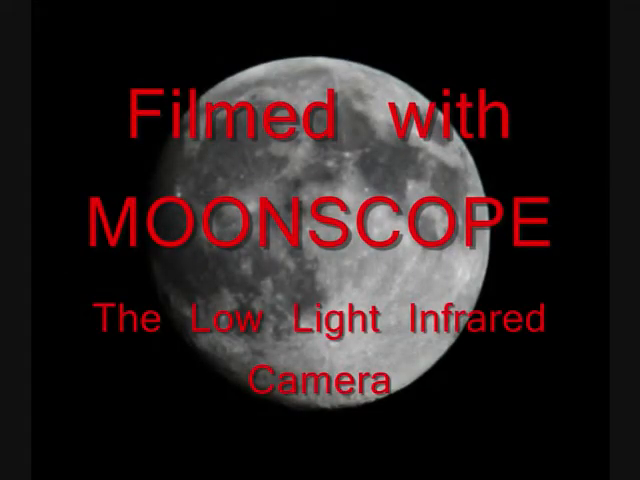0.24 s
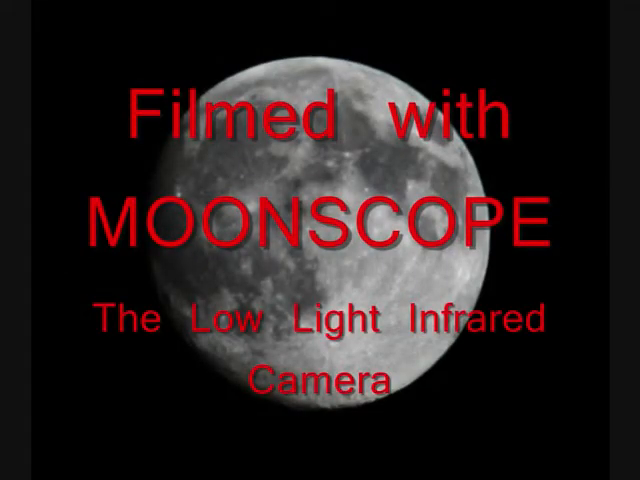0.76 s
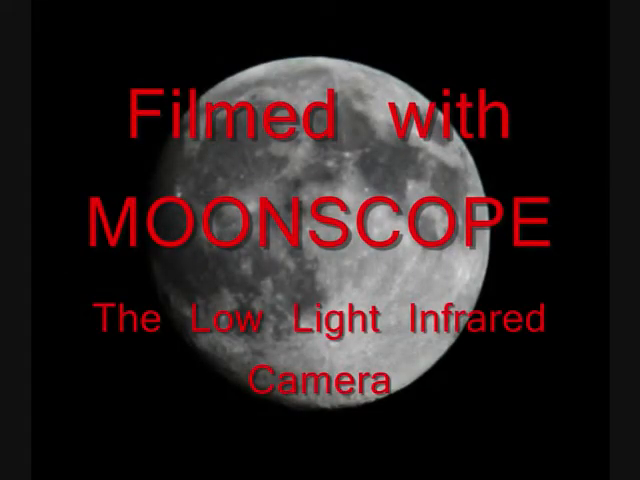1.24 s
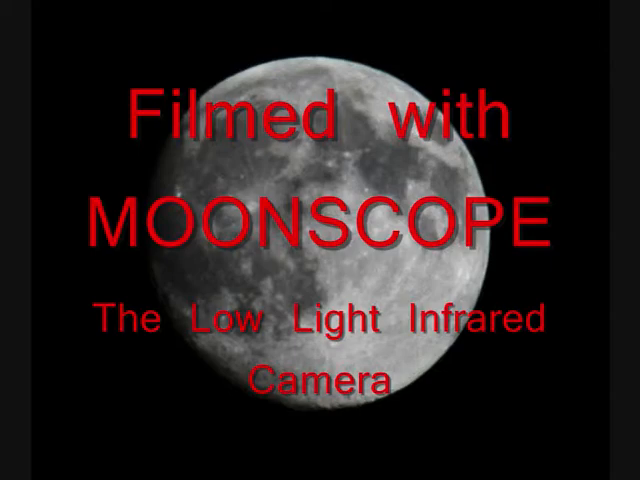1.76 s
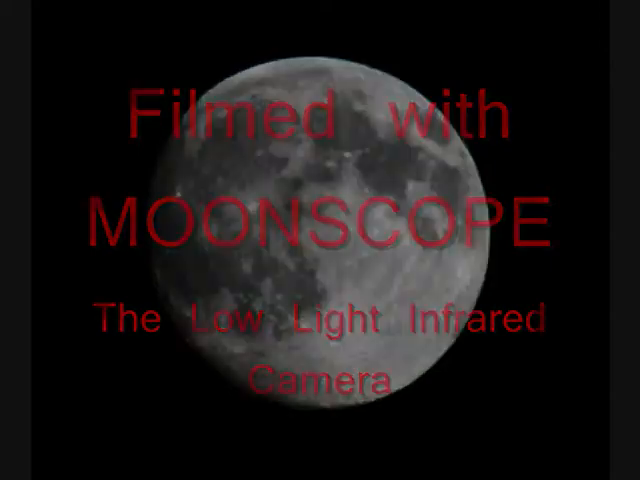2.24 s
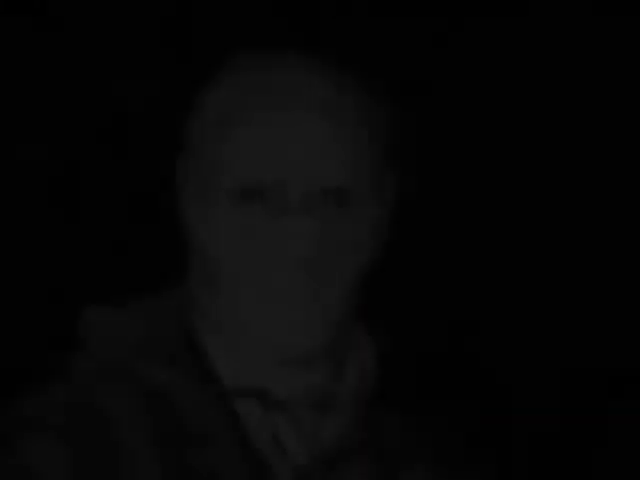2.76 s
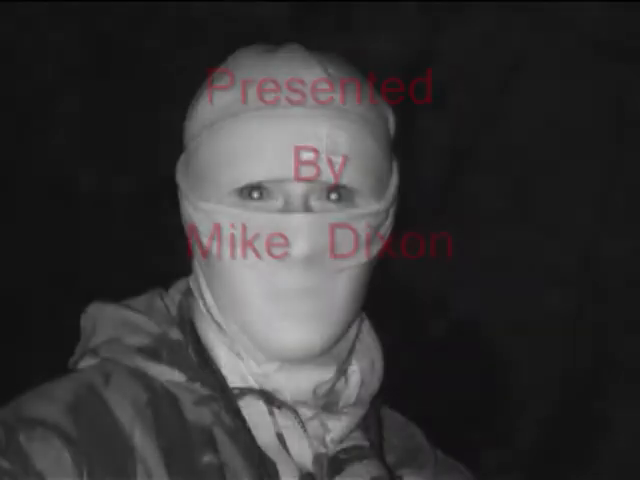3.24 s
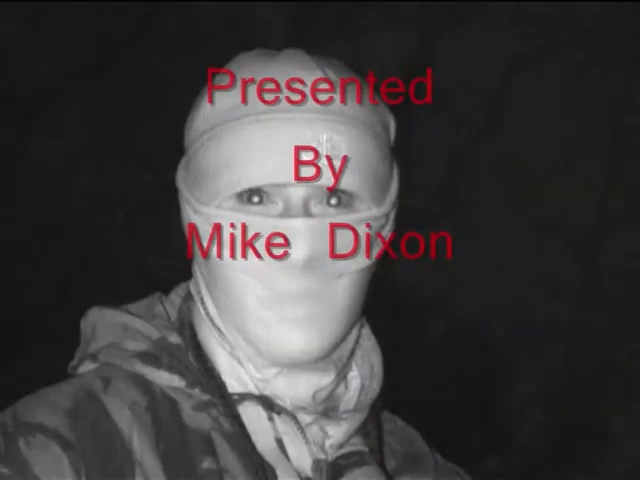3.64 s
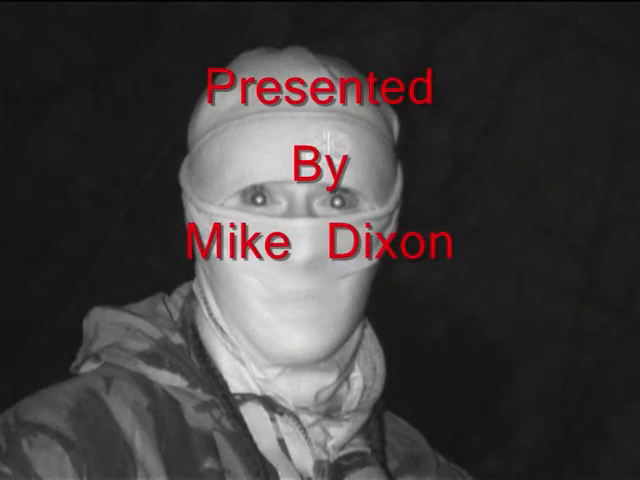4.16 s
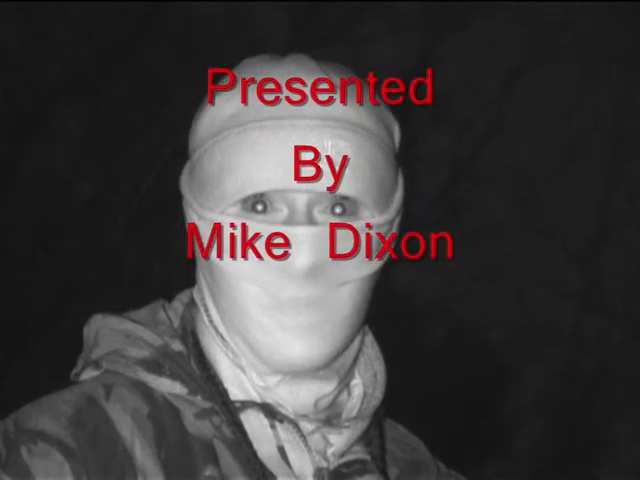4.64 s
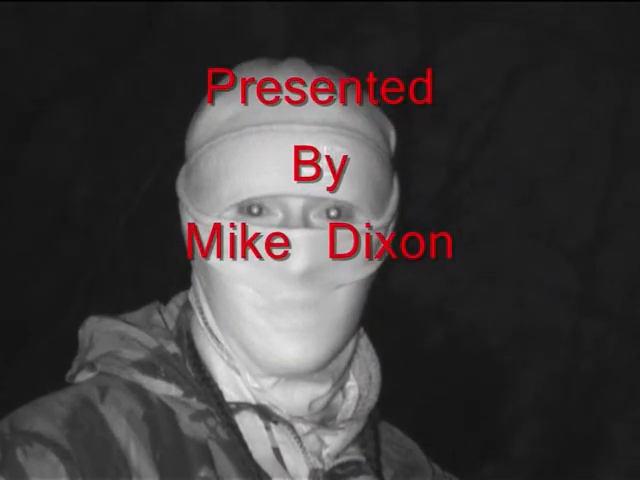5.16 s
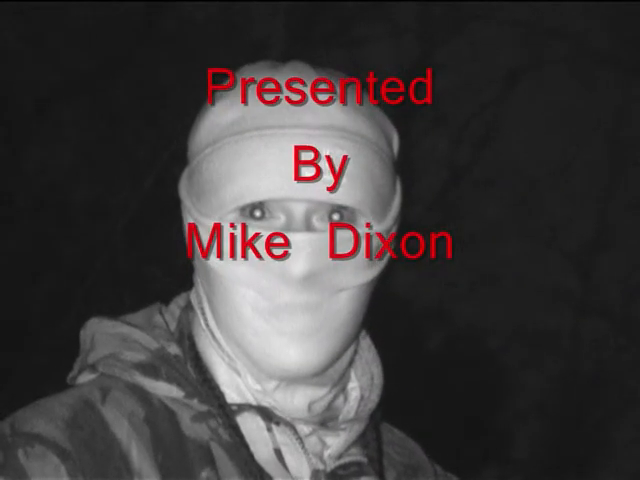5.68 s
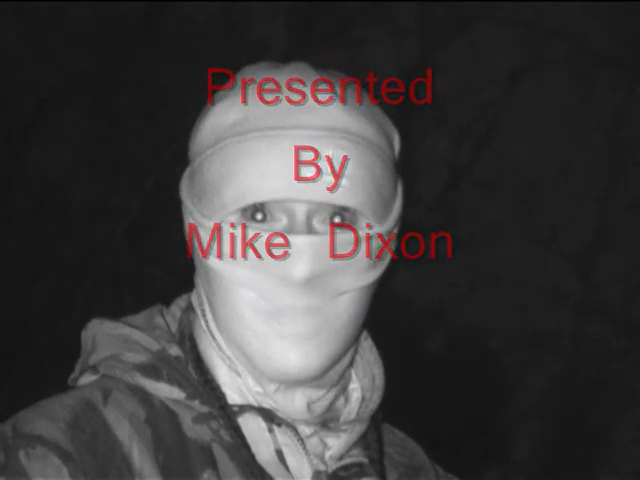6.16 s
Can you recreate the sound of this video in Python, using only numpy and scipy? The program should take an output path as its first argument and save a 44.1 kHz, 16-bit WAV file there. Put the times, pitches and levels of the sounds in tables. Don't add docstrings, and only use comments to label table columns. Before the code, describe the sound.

Quiet night woodland with low traffic rumble and hiss, two brief piercing owl shrieks to the right, and one faint echoing hoot between them.

```python
import sys
import numpy as np
from scipy import signal
from scipy.fft import rfft, irfft, next_fast_len
from scipy.io import wavfile
from scipy.ndimage import uniform_filter1d

SR = 44100
rng = np.random.default_rng(int(sys.argv[2]) if len(sys.argv) > 2 else 0)


def file_out(sig):
    cols = np.atleast_2d(sig).T
    lim = np.clip(cols, -1, 1)
    pcm = np.round(lim * 32767).astype(np.int16)
    wavfile.write(sys.argv[1], SR, pcm)


def boost(x):
    u = np.asarray(x, float) / 20
    return 10 ** u


N = 282795

LEFT_RIGHT = np.array([[1], [-1]])


def over_hz(table, hz):
    table_hz, values = np.transpose(table)
    return np.interp(np.log(np.maximum(hz, 1)), np.log(table_hz), values)


def over_time(rows, smooth_s):
    s, *columns = np.transpose(rows)
    t = np.arange(s[0] * SR, s[-1] * SR) / SR
    smooth = int(smooth_s * SR)
    curves = [uniform_filter1d(np.interp(t, s, c), smooth, mode="nearest") for c in columns]
    return int(s[0] * SR), curves


def band(size, hz, octaves):
    f = np.maximum(np.fft.rfftfreq(size, 1 / SR), 1)
    bell = np.exp(-.5 * (np.log2(f / hz) / octaves) ** 2)
    return irfft(rfft(rng.standard_normal((2, size))) * bell, size)


def walk(size, rate):
    hold = int(SR / rate)
    levels = np.repeat(rng.standard_normal(size // hold + 1), hold)
    return 1.8 * uniform_filter1d(uniform_filter1d(levels, hold), hold)[:size]


# frequency in Hz, level in dB per Hz.
NIGHT_SPECTRUM = [(15, -39), (25, -6.5), (70, -0.5), (140, -6.5), (184, -14), (228, -16), (291, -22.5),
                  (391, -16.5), (447, -24), (602, -9.5), (670, -17), (854, -13.5), (3120, -26.5),
                  (7790, -39.5), (15700, -37.5)]
# frequency in Hz, left-right likeness from 0 to 1.
LIKENESS = [(25, .88), (60, .78), (130, .3), (300, .05), (3000, .05), (6000, .15), (15000, .08)]
# frequency in Hz, left minus right in dB.
TRAFFIC_PAN = [(70, 0), (150, 2.5), (400, 1), (1500, 1)]


def night():
    size, out = next_fast_len(N), 0
    for hz in 22 * 2 ** np.arange(0, 9.8, .5):
        mid, side = band(size, hz, .24)[:, :N]
        alike = over_hz(LIKENESS, hz)
        drift_db = .4 * walk(N, 1.5) + 1.1 * walk(N, 7.4)
        db = over_hz(NIGHT_SPECTRUM, hz) + drift_db + over_hz(TRAFFIC_PAN, hz) * LEFT_RIGHT / 2
        out = out + boost(db) * (np.sqrt(1 + alike) * mid + np.sqrt(1 - alike) * side * LEFT_RIGHT)
    return out * boost(-61) / np.sqrt(np.mean(out.mean(0) ** 2))


# share of the syllable, pitch in Hz, effort in dB.
LOW_SYLLABLE = [(0, 1136, -8), (0.041, 1178, -11), (.11, 1243, -8.5), (0.381, 1154, -9.5), (.58, 1098, -11),
                (0.748, 1132, -6), (1.001, 1267, 0.5)]
# share of the fall's time, share of the pitch drop, effort in dB.
FLICK = [(.27, .23, 0.5), (.65, .47, -4), (.78, .72, -10.5), (1, 1, -20.5)]


def shriek_course(start, brk, fall, end, top_hz):
    break_hz, end_hz = 1480, 995
    high_start = brk + 0.0126
    crest = fall - 0.021
    fall_hz = 0.99 * top_hz
    low = [(start + share * (brk - start), hz, db) for share, hz, db in LOW_SYLLABLE]
    arch = [(high_start, break_hz, 0),
            ((high_start + crest) / 2, .35 * break_hz + .65 * top_hz, 0),
            (crest, top_hz, 0),
            (fall, fall_hz, 0)]
    flick = [(fall + share * (end - fall), fall_hz - drop * (fall_hz - end_hz), db)
             for share, drop, db in FLICK]
    return over_time(low + arch + flick, 0.0074)


# frequency in Hz, gain in dB.
THROAT = [(1500, -1.5), (2300, -4), (2650, 3.5), (2970, 7), (3270, 14), (3780, 11.5), (4250, 13), (5200, 7)]
# centre in Hz, width in Hz, depth in dB.
NOTCHES = [(1307, 46, -18), (2424, 26.4, -17.5), (2800, 45, -17.5), (3135, 35, -9), (3453, 121, -9)]


def partial_db(k, hz, effort_db, full_db):
    notch_db = sum(db * np.exp(-.5 * ((k * hz - at_hz) / width_hz) ** 2) for at_hz, width_hz, db in NOTCHES)
    growth = np.clip(1 + 1.2 * (k - 2.8), 1, 3)
    return -41.5 + full_db + growth * effort_db + over_hz(THROAT, k * hz) + notch_db


def two_slopes(first_s, near_t60, near_db, far_t60, far_db, size):
    s = np.linspace(0, size / 100, 2 * size)
    trunks = boost(2 * (near_db - 60 * s / near_t60))
    slopes = boost(2 * (far_db - 60 * s / far_t60))
    build_up = np.minimum(1, (s + 1e-4) / first_s) ** 2
    return np.transpose([s, 10 * np.log10((trunks + slopes) * build_up)])


# frequency in Hz, echo strength in dB, leaf loss in dB per s.
SCATTER = [(700, 0, 0), (1400, -5, 0), (2800, -2.5, 15), (5600, 6, 55), (11200, 8, 70)]


def wood(voice, echo, clump_db):
    (density_db,) = over_time(echo, 0.012)[1]
    size = len(density_db)
    t = np.arange(size) / SR
    response = sum(band(size, hz, 0.49) * boost(db - loss_db * t) for hz, db, loss_db in SCATTER)
    clumps_db = clump_db * walk(size, 25)
    response = response * boost(density_db + clumps_db) / np.sqrt(.05 * SR)
    return signal.fftconvolve(voice[None], response, axes=1)[:, :N]


# start in seconds,
# voice break in seconds, start of fall in seconds, end in seconds, top pitch in Hz.
SHRIEKS = [
    (0.32, 0.481, .534, .616, 1535),
    (5.005, 5.152, 5.236, 5.302, 1631),
]
# frequency in Hz, left minus right in dB.
SHRIEK_PAN = [(1000, -9), (2400, -6), (3200, -5), (4600, -2), (8000, -.5)]
# partial number, level in dB at full effort.
PARTIALS = [(1, 1.5), (2, 1), (3, -9), (4, -17.5), (5, -22), (6, -33), (7, -35.5), (8, -55), (9, -52)]
# centre in Hz, width in Hz, level in dB relative to partial 3.
BREATH = [(3860, 850, -28), (7000, 3300, -25), (12000, 19000, -35)]


def shrieks():
    lead_s = 2.6e-5
    direct = np.zeros((2, N))
    for call in SHRIEKS:
        start, (hz, effort_db) = shriek_course(*call)
        size = len(hz)
        count = np.arange(size)
        heard = direct[:, start:start + size]
        phase = 2 * np.pi * np.cumsum(hz * (1 + 0.0037 * walk(size, 206.3))) / SR
        edge = np.minimum(1, np.minimum(count, count[::-1]) / (0.0041 * SR))
        partials = [(round(k), partial_db(round(k), hz, effort_db, db)) for k, db in PARTIALS]
        for k, db in partials:
            flutter_db = (1.2 + .4 * k) * np.array([walk(size, 140), walk(size, 140)])
            wave = np.sqrt(2) * np.sin(k * (phase + np.pi * hz * lead_s * LEFT_RIGHT))
            pan_db = over_hz(SHRIEK_PAN, k * hz) * LEFT_RIGHT / 2
            heard += wave * boost(db + flutter_db + pan_db) * edge
        puff = band(size, 2500, 0.85)[0]
        heard += puff / puff.std() * boost(-53.5) * edge * np.exp(-count / (0.0051 * SR))
        third_db = partials[2][1]
        for centre_hz, width_hz, db in BREATH:
            air = band(size, centre_hz, width_hz / centre_hz / 2)[0]
            heard += air / air.std() * boost(third_db + db) * edge
    echo = two_slopes(first_s=.008, near_t60=.5, near_db=-5.5, far_t60=2.0, far_db=-23, size=120)
    return direct + wood(direct.mean(0), echo, clump_db=1.2)


# time in seconds, level in dB,
# centre in Hz, width in Hz, length in seconds.
STIRS = [(1.002, -62.5, 1380, 260, .045), (1.0, -67.5, 2140, 349, 0.034), (1.91, -69, 2900, 502, 0.032),
         (2.702, -78, 5900, 1500, 0.094), (2.673, -67.5, 1440, 900, 0.068),
         (2.984, -62.5, 1583, 700, 0.022), (3.121, -80, 3540, 100, 0.2), (3.384, -64.5, 1228, 249, 0.036),
         (3.661, -63, 1490, 650, 0.045), (3.849, -82, 6200, 1489, 0.09), (4.803, -68.5, 1900, 400.2, 0.05)]


def stirs():
    half = 8192
    out, t = np.zeros((2, N)), np.arange(-half, half) / SR
    for s, db, hz, width_hz, length in STIRS:
        puff = band(len(t), hz, width_hz / hz / 2)
        centre = int(s * SR)
        out[:, centre - half:centre + half] += boost(db) * puff / puff.std() * np.exp(-(t / length) ** 2)
    return out


# time in seconds, pitch in Hz, level as sung in dB.
HOOT = [(2.77, 775, -76), (2.85, 808, -65), (2.885, 835, -52), (2.95, 872, -53), (3.1, 883, -52),
        (3.23, 872, -51), (3.36, 810, -52), (3.52, 735, -58), (3.72, 655, -74)]
# centre in seconds,
# half length in seconds, level in dB.
CLEAR_AIR = [(2.96, .025, 3), (3.1, .07, 4), (3.22, .04, 6), (3.325, .025, 7), (3.45, .025, 7)]


def hoot():
    start, (hz, db) = over_time(HOOT, 0.036)
    voice, t = np.zeros(N), np.arange(N) / SR
    phase = 2 * np.pi * np.cumsum(hz * (1 + 0.0019 * walk(len(hz), 28.86))) / SR
    voice[start:start + len(hz)] = boost(db) * np.sin(phase)
    clear = sum(boost(clear_db) * np.exp(-((t - s) / half_s) ** 4) for s, half_s, clear_db in CLEAR_AIR)
    slope_s, lag_s = .09, 2.7e-4
    slope = clear * np.array([np.roll(voice, int(s * SR)) for s in (slope_s, slope_s + lag_s)])
    straight = boost(-6) * voice
    echo = two_slopes(first_s=.06, near_t60=1.0, near_db=0, far_t60=5.0, far_db=-2, size=260)
    lull = boost(-16 * np.exp(-((t - 3.28) / .016) ** 2))
    return lull * (boost(.6 * LEFT_RIGHT) * slope + straight + wood(voice, echo, clump_db=2.5))


def scene():
    return shrieks() + hoot() + night() + stirs()


# from in seconds, to in seconds.
MONO_TREBLE = [(0, 0.082), (.25, 0.37), (.475, 0.79), (0.982, 1.05), (1.72, 1.75), (2.05, 2.17),
               (2.24, 2.35), (2.66, 2.7), (3.13, 3.17), (3.77, 3.92), (5.269, 5.4), (5.99, 6.03)]


def share_treble(dry):
    t = np.arange(N) / SR
    spells = sum(1. * (t >= a) * (t < b) for a, b in MONO_TREBLE)
    mono = uniform_filter1d(spells, int(0.014 * SR))
    treble = signal.sosfiltfilt(signal.butter(10, 4700, "high", fs=SR, output="sos"), dry)
    return dry + mono * (treble[1] - treble)


def roll_off(x):
    return signal.sosfilt(signal.butter(12, 15980, fs=SR, output="sos"), x)


def record(dry):
    mix = share_treble(dry)
    return roll_off(mix)


dry = scene()
out = record(dry)
file_out(out)
```